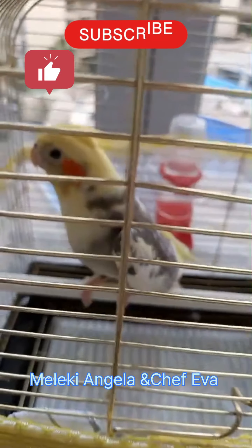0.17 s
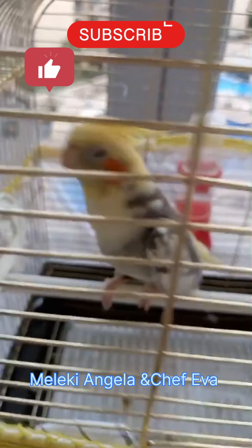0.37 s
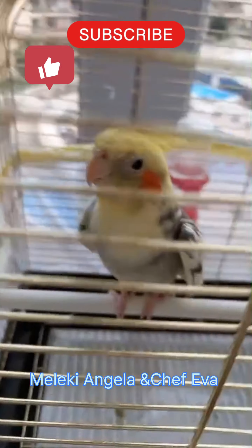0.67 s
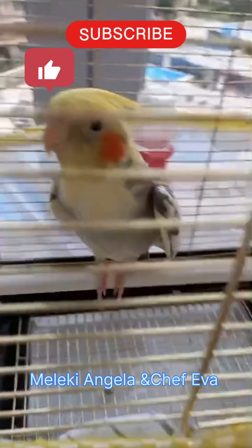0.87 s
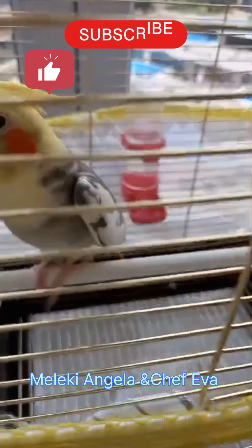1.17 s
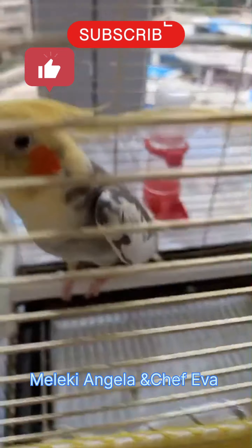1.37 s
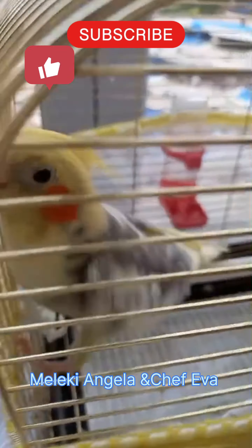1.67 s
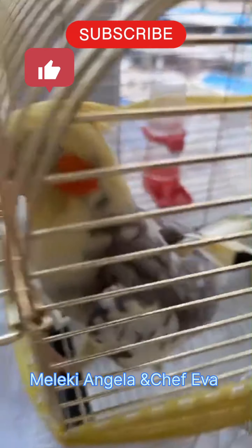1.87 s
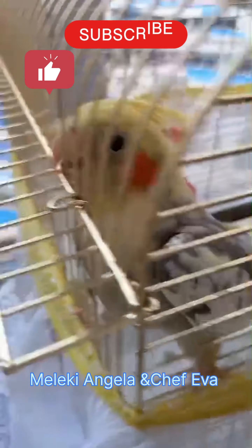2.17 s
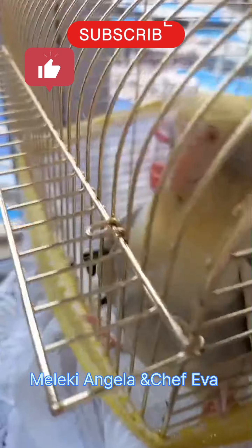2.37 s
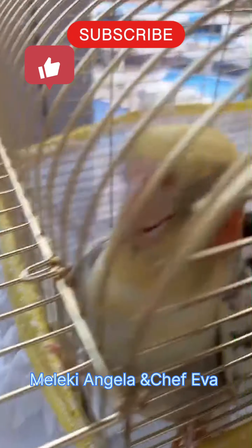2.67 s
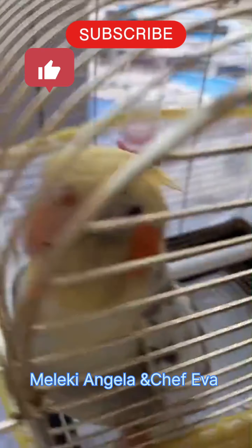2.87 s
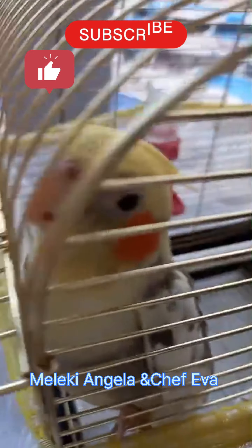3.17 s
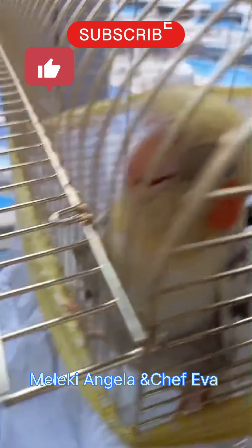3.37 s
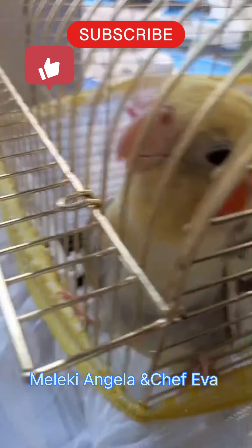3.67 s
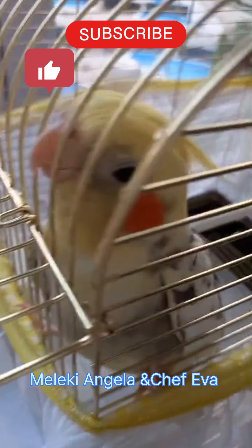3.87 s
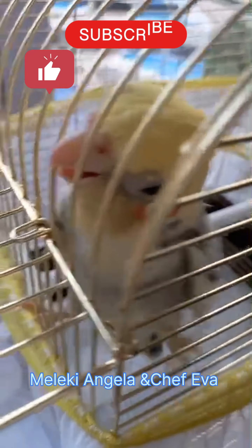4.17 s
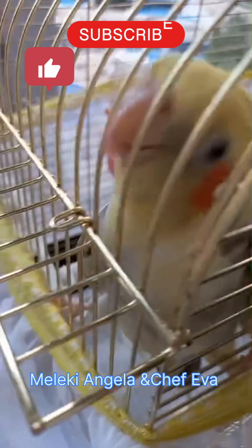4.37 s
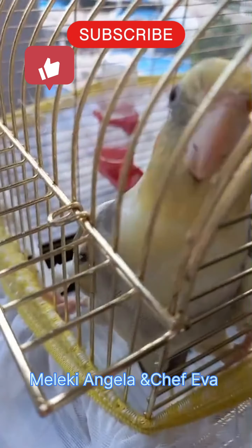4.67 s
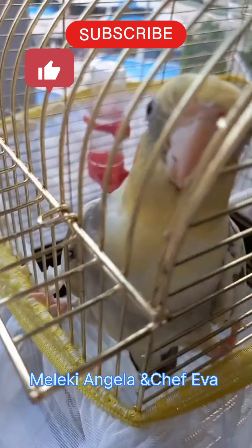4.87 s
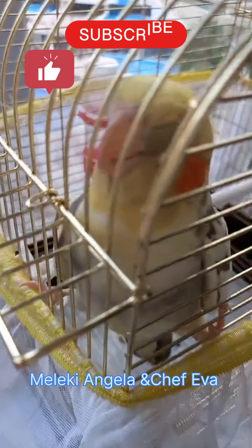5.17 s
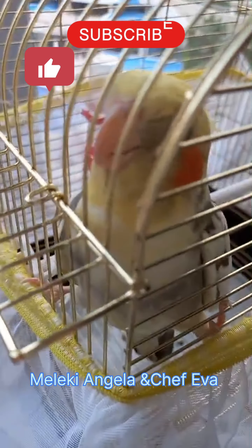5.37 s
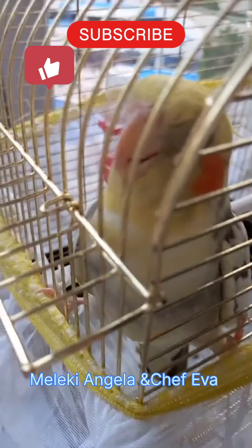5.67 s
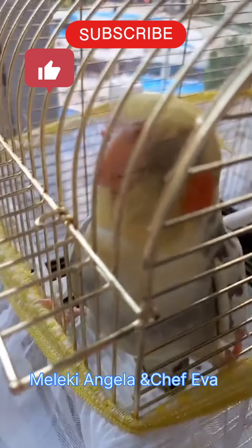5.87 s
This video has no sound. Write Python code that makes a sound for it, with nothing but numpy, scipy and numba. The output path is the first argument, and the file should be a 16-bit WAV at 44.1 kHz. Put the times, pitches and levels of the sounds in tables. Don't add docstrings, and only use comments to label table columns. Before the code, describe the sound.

A caged cockatiel close by gives a wavering whistle, a run of raspy chirps, a hiss, a leaping whistle, then more chirps indoors.

```python
import sys
import numpy as np
from scipy import signal
from scipy.fft import rfft, irfft
from scipy.io import wavfile
from scipy.ndimage import uniform_filter1d
from numba import njit

SR = 44100
rng = np.random.default_rng(int(sys.argv[2]) if len(sys.argv) > 2 else 0)


def voltage_ratio(level):
    return 10 ** (np.asarray(level, float) / 20)


def log_audio(samples):
    frames = np.atleast_2d(samples).T
    limited = np.clip(frames, -1, 1)
    pcm = np.round(limited * 32767).astype(np.int16)
    wavfile.write(sys.argv[1], SR, pcm)


N = 265923
T = np.arange(N) / SR
BIN_HZ = np.arange(N // 2 + 1) * SR / N


def unit(x):
    return x / np.sqrt(np.mean(x ** 2))


def shape(table, hz):
    f, v = np.transpose(table)
    return np.interp(np.log(np.maximum(hz, 1)), np.log(f), v)


def colour(x, table):
    return irfft(rfft(x) * voltage_ratio(shape(table, BIN_HZ)), N)


def over_time(table):
    return np.interp(T, *np.transpose(table))


def gate(t0, t1, edge=0.006, attack=None):
    return np.clip(np.minimum((T - t0) / (attack or edge), (t1 - T) / edge), 0, 1)


def play(notes):
    s, *columns = np.concatenate(notes).T
    gates = [gate(n[0][0] - 0.002, n[-1][0] + 0.0034, attack=0.004) for n in notes]
    return [np.interp(T, s, c) for c in columns], np.max(gates, axis=0)


def walk(rate):
    k = int(SR / rate)
    held = np.repeat(rng.standard_normal(N // k + 1), k)
    return unit(uniform_filter1d(uniform_filter1d(held, k), k)[:N])


@njit
def svf(x, hz, width):
    y, b, l = np.empty(len(x)), 0., 0.
    for i in range(len(x)):
        g, k = np.tan(np.pi * hz[i] / SR), width / hz[i]
        v = (b + g * (x[i] - l)) / (1 + g * (g + k))
        b, l, y[i] = 2 * v - b, l + 2 * g * v, k * v
    return y


def resonate(x, hz1, width1, hz2, width2):
    return unit(svf(svf(x, hz1 + 0 * T, width1), hz2 + 0 * T, width2))


# start_s [s], level_db [dB]
HUM_LEVEL = [(0.0, -72), (0.64, -55), (1.09, -68), (1.54, -62), (1.83, -72), (1.98, -55.5), (2.25, -78.5),
             (2.6, -63.5), (2.8, -70), (3.27, -49), (3.32, -62.5), (4.25, -58), (4.35, -74), (4.4, -55.5),
             (4.55, -59), (4.6, -78.5), (5.14, -56.5), (6.03, -72.5)]


def hum():
    lag_s = 0.00062
    noise = rng.standard_normal(N)
    tone = resonate(noise, 84 * (1 + 0.032 * walk(4.7)), 6.1, 84, 24.0)
    left, right = tone * voltage_ratio(over_time(HUM_LEVEL) + np.array([[-1.2], [1.2]]))
    return np.array([left, np.roll(right, int(lag_s * SR))])


# pitch_hz [Hz], level_db [dB per Hz]
AIR_COLOUR = [(240, -42.5), (400, -13), (446, -12.5), (597, -4), (730, -11.5), (891, -10.5), (1370, -15),
              (1510, -15.5), (4850, -23), (5750, -14), (7030, -12), (8580, -28.5), (11900, -22.5),
              (15900, -21.5)]
# pitch_hz [Hz], level_db [dB per Hz]
RUMBLE_COLOUR = [(15, -7.5), (30, -10), (60, 2.5), (120, -7.5), (250, -6.5), (450, -15), (700, -43)]
# centre_s [s], half_length_s [s], lift_db [dB]
RUSTLES = [
    (1.085, .09, 6),
    (1.285, 0.22, 12.5),
    (1.669, 0.15, 14),
    (2.5, 0.25, 13.5),
    (4.234, 0.055, 17),
    (5.838, 0.12, 9),
]


def room_air(bird):
    air_db, rumble_db, lift_s, lift_ref_db = -72, -72.5, 0.11, -46.5
    k = int(lift_s * SR)
    loudness = uniform_filter1d(uniform_filter1d(np.abs(bird), k), k // 2)
    lift = 1 + loudness / voltage_ratio(lift_ref_db)
    noise, sign = rng.standard_normal((4, N)), np.array([[1], [-1]])
    rumble = unit(colour(noise[0], RUMBLE_COLOUR) + 0.45 * sign * colour(noise[1], RUMBLE_COLOUR))
    rumble = rumble * voltage_ratio(rumble_db + 0.12 * (over_time(HUM_LEVEL) + 65)) * lift ** 0.19
    hush = unit(colour(noise[2], AIR_COLOUR) + sign * colour(noise[3], AIR_COLOUR))
    high = signal.butter(N=1, Wn=2800, btype="high", fs=SR, output="sos")
    rustle_db = sum(db * np.exp(-((T - s) / half) ** 2) for s, half, db in RUSTLES)
    rustle = signal.sosfilt(high, hush) * (voltage_ratio(rustle_db) - 1)
    return rumble + (hush + rustle) * voltage_ratio(air_db + 1.3 * walk(4.3)) * lift ** 0.24


# pitch_hz [Hz], level_db [dB per Hz]
RATTLE_COLOUR = [(150, -84), (250, -46.5), (616, -18), (1230, -6.5), (1370, -3.5), (1690, 2), (2110, 1),
                 (2740, -4.5), (3620, -27), (5480, -21.5), (7490, -47.5), (8610, -51), (15800, -32)]
# pitch_hz [Hz], level_db [dB per Hz]
SIZZLE_COLOUR = [(5000, -31.5), (8000, -16.5), (11000, -4), (13000, 2), (15500, -6)]


def rasp(notes, low_ratio, sputter_db, steady, sizzle_db):
    (hz, db, beak_db, third_db, low_db), on = play(notes)
    cycle = np.floor(np.cumsum(hz / 3 * np.exp(0.4 * walk(500))) / SR)
    slaps = np.diff(cycle, prepend=0) * voltage_ratio(1.7 * rng.standard_normal(N))
    drive = unit(slaps) + 0.61 * rng.standard_normal(N)
    phase = 2 * np.pi * np.cumsum(hz * (1 + 0.02 * walk(160))) / SR
    swing = np.sin(phase) + voltage_ratio(third_db - 23.5) * np.sin(3 * phase)
    tone = steady * voltage_ratio(3.98 * walk(110)) * swing + resonate(drive, hz, 89.0, hz, 180.0)
    beak = resonate(drive, np.minimum(1.4 * hz, 3050), 520.0, np.minimum(1.3 * hz, 2900), 660.0)
    beak = beak + 0.55 * resonate(drive, 2720, 260.0, 2720, 500.0)
    third = resonate(drive, 2900 + 1.303 * hz, 300.0, 5400, 1600.0)
    third = third + 0.31 * resonate(drive, 2.26 * hz, 1600.0, 4300, 2000.0)
    low = resonate(drive, low_ratio * hz, 490.0, 750, 650.0)
    voice = voltage_ratio(3.0) * tone + voltage_ratio(beak_db + 2) * beak + voltage_ratio(third_db - 1.0) * third + voltage_ratio(low_db - 8) * low
    voice = voice + voltage_ratio(2.5) * unit(colour(drive, RATTLE_COLOUR))
    voice = voice + voltage_ratio(low_db + sizzle_db) * unit(colour(drive, SIZZLE_COLOUR))
    return on * voltage_ratio(db + sputter_db * walk(330)) * voice


def short_rasp(row, third_db, low_db, peak_share, start_db, end_db):
    s, length, hz, db, beak_db = row
    swell = ((0, start_db), (peak_share, 0), (1, end_db))
    return [(s + share * length, hz, db + d, beak_db, third_db, low_db) for share, d in swell]


# start_s [s], length_s [s], pitch_hz [Hz], level_db [dB], beak_db [dB]
LEADS = [
    (1.165, .034, 1336, -48, 8.5),
    (1.29, .085, 1479, -52.5, 1),
    (2.431, 0.012, 1447, -56, -19),
    (2.448, 0.027, 1856, -41, -14.5),
    (4.133, 0.022, 1345, -44.5, 7),
    (5.032, .01, 1334, -54.5, -24),
    (5.044, .033, 1866, -39.5, -5.5),
]


def leads():
    return rasp([short_rasp(r, -16, -21, 0.81, -5, -9.5) for r in LEADS], 0.98, 3.5, 0.3, -20)


# start_s [s], pitch_hz [Hz], level_db [dB], beak opening [0-1], squeeze [0-1]
FIRST_CALL = [
    [(1.166, 1322, -59, 1.04, 1.04), (1.18, 1324, -62.5, 1.07, 0.8)],
    [(1.197, 1330, -52, 0.95, 0.94), (1.211, 1271, -38, 0.81, 0.55), (1.239, 1203, -36, 0.06, 0.2),
     (1.305, 1407, -34, 0, -.3), (1.33, 1363, -47, .1, -.2)],
    [(1.378, 1276, -45, .3, 0.1), (1.396, 1190, -42.5, .05, 0.04), (1.43, 1230, -40, .3, 0.83),
     (1.528, 1231, -40, .1, 0.92), (1.562, 1259, -36.5, 0.17, .75), (1.578, 1304, -35, 0.64, 0.89),
     (1.611, 1287, -38, .75, 0.77), (1.625, 1239, -42, 0.46, 0.77)],
]
SECOND_CALL = [
    [(4.13, 1292, -48, 1.13, 0.87), (4.143, 1302, -57, 0.79, 0.71)],
    [(4.157, 1255, -45.5, 0.96, 0.4), (4.177, 1297, -35.5, 0.97, 0.7), (4.207, 1250, -30.5, 0.58, .25),
     (4.261, 1521, -41.5, 0.046, -.2), (4.27, 1491, -31, 0.09, -.2)],
    [(4.4, 1366, -57, .5, .3), (4.436, 1161, -39, 0.46, .2), (4.466, 1176, -39.5, 0.24, .5),
     (4.532, 1333, -32, .5, 0.48), (4.563, 1874, -25.5, 0.25, 0.2), (4.567, 2496, -24.5, .07, .01),
     (4.574, 2566, -18, .01, .01), (4.584, 2672, -22.5, 0.27, .01), (4.64, 2556, -68.5, .1, 0.33)],
]
# start_s [s], end_s [s], cycles in the pattern, low_db below 2.4 kHz [dB], high_db above [dB]
BREAKS = [
    (1.247, 1.316, 2, -39, -64),
    (1.402, 1.457, 2, -50, -45.5),
    (1.45, 1.581, 3, -57, -42.5),
    (4.213, 4.264, 2, -36, -60.5),
    (4.444, 4.494, 3, -56.5, -58.5),
    (4.482, 4.54, 2, -41, -45),
]
# pitch_hz [Hz], level_db [dB]
THROAT = [(400, -26.5), (700, -6.5), (1200, -2), (2000, 1.5), (3100, -10), (4300, -23), (6000, -27.5),
          (7500, -23.5), (9500, -18.5), (12000, -20.5), (15000, -39.5)]


def whistles():
    (hz, level_db, beak, squeeze), on = play(FIRST_CALL + SECOND_CALL)
    second_db = level_db - 34.5 + 45 * beak
    third_db = level_db - 46 + 44 * squeeze
    upper_db = level_db - 30.5 + 39.5 * squeeze
    shut_hz, open_hz = 6390, 5000
    peak_hz = shut_hz + (open_hz - shut_hz) * np.clip(beak, 0, 1)
    phase = 2 * np.pi * np.cumsum(hz * (1 + 0.0045 * walk(170))) / SR

    def throat(f):
        return voltage_ratio(shape(THROAT, f)) + 0.55 / (1 + ((f - peak_hz) / 450) ** 2) ** 1.5

    out = sum(voltage_ratio(d + 6.5) * np.sin(k * phase) for k, d in enumerate((level_db, second_db, third_db), 1))
    upper = 0
    for k in range(4, 12):
        upper = upper + voltage_ratio(upper_db) * throat(k * hz) * (k * hz < 15700) * np.sin(k * phase)
    out = out + voltage_ratio(2.5 * walk(400)) * upper
    haze = voltage_ratio(0.34 * (level_db + 37.5) - 53)
    for cycles in (2, 3):
        breaks = [b for b in BREAKS if round(b[2]) == cycles]
        low = sum(gate(b[0], b[1], 0.012) * voltage_ratio(b[3]) for b in breaks)
        high = sum(gate(b[0], b[1], 0.012) * voltage_ratio(b[4]) for b in breaks)
        haze = haze + voltage_ratio(-11) * low
        for k in np.arange(1, 9 * cycles) / cycles:
            if k % 1:
                peak = 0.51 + 1 / (1 + ((k * hz - peak_hz + 250) / 350) ** 2)
                level = np.where(k * hz < 2400, low, high * peak)
                out = out + level * throat(k * hz) * np.sin(k * phase)
    breath = (haze + voltage_ratio(upper_db - 12)) * unit(colour(rng.standard_normal(N), THROAT))
    sizzle = unit(colour(rng.standard_normal(N), SIZZLE_COLOUR))
    sizzle = voltage_ratio(level_db - 27 + 16 * beak + 3 * walk(120)) * sizzle
    return np.sqrt(2) * on * voltage_ratio(1.1 * walk(90)) * out + on * (breath + sizzle)


# start_s [s], level_db [dB], pitch_hz [Hz]
TICKS = [
    (1.8406, -48, 6150),
    (2.11, -67.5, 758),
    (2.235, -65.5, 734),
    (2.271, -66.5, 1064),
    (2.2165, -54.5, 5480),
    (4.383, -67.5, 2679),
    (4.6504, -53.5, 2700),
    (4.6742, -42.5, 2610),
]


def ticks():
    out, t = np.zeros(N), np.arange(1500) / SR
    for s, db, hz in TICKS:
        i = int(s * SR)
        snap = hz / 6000 * np.diff(rng.standard_normal(1500), prepend=0) * np.exp(-t / 0.004)
        ring = 1.2 * np.sin(2 * np.pi * hz * t) * np.exp(-t * hz / 18)
        out[i:i + 1500] += voltage_ratio(db) * (snap + ring)
    return out


# start_s [s], pitch_hz [Hz]
CHIRP_TOP = [(2.5, 2401), (2.7, 2485), (2.9, 2259), (3.6, 2200), (5.1, 2062), (5.9, 2282)]


def chirp(start, lowest, end, low_hz, db, fall_bend, beak_onset_db):
    rise_s, rise_bend, rise_to_hz = 0.05, 1.4, 2140
    onset_db, onset_share, dip_s, release_s = -11, 0.4, 0.016, 0.011
    s = np.linspace(start, end, 14)
    before = np.clip((lowest - s) / (lowest - start), 0, 1)
    fall = before ** fall_bend
    rise = np.clip((s - lowest) / rise_s, 0, 1) ** rise_bend
    top_hz = np.interp(start, *np.transpose(CHIRP_TOP))
    hz = low_hz + (top_hz - low_hz) * fall + (rise_to_hz - low_hz) * rise
    onset = np.clip((before - 1) / onset_share + 1, 0, 1)
    dip = np.exp(-((s - lowest) / dip_s) ** 2)
    release = np.clip(1 - (end - s) / release_s, 0, 1)
    level_db = db + onset_db * onset - 2.5 * dip - 10.5 * release - rise
    beak_db = -1.5 - 16 * (1 - fall - rise) ** 2 + (beak_onset_db - onset_db) * onset - 2.5 * rise
    third_db, low_db = -12 - 14.5 * dip, -20 + 10.5 * dip
    return np.transpose([s, hz, level_db, beak_db, third_db, low_db])


# start_s [s], lowest_s [s], end_s [s], lowest pitch_hz [Hz], level_db [dB]
OPENERS = [
    (2.52, 2.594, 2.625, 1880, -33),
    (5.13, 5.181, 5.235, 1880, -33),
]
CHIRPS = [
    (2.677, 2.733, 2.79, 1690, -30),
    (2.843, 2.904, 2.955, 1658, -30.5),
    (3.016, 3.074, 3.135, 1526, -30.5),
    (3.194, 3.255, 3.313, 1585, -31.5),
    (3.363, 3.435, 3.495, 1544, -31.5),
    (3.556, 3.619, 3.635, 1495, -32.5),
    (5.292, 5.354, 5.4, 1650, -33.5),
    (5.458, 5.532, 5.582, 1564, -32),
    (5.638, 5.713, 5.775, 1528, -32),
    (5.834, 5.919, 5.99, 1512, -30.5),
]


def chirp_runs():
    runs = [chirp(*c, 1.5, 0.34) for c in CHIRPS] + [chirp(*c, 0.8, -17) for c in OPENERS]
    return rasp(sorted(runs, key=lambda n: n[0][0]), 0.33, 1.3, 1.94, -19)


# start_s [s], pitch_hz [Hz], level_db [dB]
WHEEZE = [(3.51, 12550, -76.5), (3.56, 14020, -66), (3.62, 13880, -58), (3.675, 13900, -61),
          (3.73, 13550, -60), (3.78, 12670, -76.5)]
# start_s [s], level_db [dB], beak pitch_hz [Hz]
HISS = [(3.69, -69, 2470), (3.736, -48.5, 2350), (3.76, -45, 2150), (3.892, -39.5, 2660),
        (3.936, -41.5, 3160), (3.99, -71.5, 3000)]
# pitch_hz [Hz], level_db [dB per Hz]
HISS_COLOUR = [(150, -58.5), (250, -49), (379, -28.5), (649, -4), (1280, 2.5), (1840, -8.5), (2650, -5.5),
               (4530, -19.5), (5880, -8.5), (8320, -28), (10600, -24.5), (14500, -50.5), (15800, -59)]


def hiss():
    (wheeze_hz, wheeze_db), wheezing = play([WHEEZE])
    wheeze = wheezing * voltage_ratio(wheeze_db) * np.sin(2 * np.pi * np.cumsum(wheeze_hz) / SR)
    (db, hz), on = play([HISS])
    breath = unit(colour(rng.standard_normal(N), HISS_COLOUR))
    band = signal.butter(N=6, Wn=[8600, 11500], btype="band", fs=SR, output="sos")
    treble = unit(signal.sosfilt(band, breath))
    top = resonate(breath, 14000, 1500.0, 14000, 1500.0)
    beak = unit(svf(breath, hz, 300.0))
    mix = breath + voltage_ratio(-6) * beak + voltage_ratio(-16) * treble + voltage_ratio(-25.5) * top
    return wheeze + on * voltage_ratio(db + 2.0 + 0.94 * walk(58)) * mix


# start_s [s], length_s [s], pitch_hz [Hz], level_db [dB], beak_db [dB]
GROWLS = [
    (4.642, .036, 1580, -48, 7.1),
    (4.674, .045, 948, -46, 10.6),
    (4.715, 0.055, 1325, -41.5, 5.7),
]


def growls():
    return rasp([short_rasp(r, -26, -5, 0.33, -2, -6) for r in GROWLS], 0.9, 1.6, 0.4, -40)


# start_s [s], left minus right level_db [dB]
PAN = [(1.1, 2.5), (1.77, 4.5), (1.94, -1), (2.16, 3.5), (3.74, 6), (3.89, 9.5), (4.37, 3), (4.44, 4.5),
       (4.75, 7.5), (4.79, 7.5), (5.67, 6.5), (6.03, 3)]
# pitch_hz [Hz], left minus right level_db [dB]
SHADOW = [(60, -0.5), (110, -5.5), (200, -7), (380, 4.5), (700, 4.5), (1290, -2), (2380, 8), (4400, 11),
          (8120, 8.5), (15000, -2.5)]


def ports(bird):
    lag_s = 0.00025
    half_db, spec = shape(SHADOW, BIN_HZ) / 2, rfft(bird)
    pan_db = over_time(PAN) - 4.5
    delay = np.exp(-2j * np.pi * BIN_HZ * lag_s)
    left = irfft(spec * voltage_ratio(half_db), N) * voltage_ratio(pan_db / 2)
    right = irfft(spec * voltage_ratio(-half_db) * delay, N) * voltage_ratio(-pan_db / 2)
    return np.array([left, right])


# pitch_hz [Hz], t60_s [s], level_db [dB]
ROOM = [(294, .3, -15), (1187, 0.41, -29), (2900, 0.27, -24), (5440, 0.27, -20.5), (11100, 0.33, -24.5)]


def room(bird):
    t, tail = T[:SR], 0
    for hz, t60, db in ROOM:
        sos = signal.butter(2, [hz / 1.56, hz * 1.97], "band", fs=SR, output="sos")
        fade = np.exp(-np.log(1000) * t / t60) * np.clip(t / 0.0025, 0, 1)
        noise = signal.sosfilt(sos, rng.standard_normal((2, SR)))
        tail = tail + voltage_ratio(db) * noise * fade / np.sqrt(np.sum(fade ** 2))
    return signal.fftconvolve(bird[None], tail * voltage_ratio(10), axes=1)[:, :N]


def scene():
    bird = leads() + whistles() + ticks() + chirp_runs() + hiss() + growls()
    return ports(bird) + room(bird) + hum() + room_air(bird)


def roll_off(x):
    return signal.sosfilt(signal.butter(12, 16270, fs=SR, output="sos"), x)


# pitch_hz [Hz], level_db [dB]
MICROPHONE = [(6300, -0.5), (7000, -8), (7700, -17), (8600, -8), (10500, -5.5), (11300, -9.5), (12500, -6),
              (15700, -6), (15900, -57.5)]


def record(dry):
    spec = rfft([colour(x, MICROPHONE) for x in dry])
    edges = np.arange(6500, 16500, 900)
    out = irfft(spec * (BIN_HZ < edges[0]), N)
    for lo, hi in zip(edges, edges[1:]):
        band = irfft(spec * (BIN_HZ >= lo) * (BIN_HZ < hi), N)
        out = out + band * voltage_ratio(3.6 * np.array([walk(45), walk(45)]))
    return roll_off(out)


dry = scene()
out = record(dry)
log_audio(out)
```